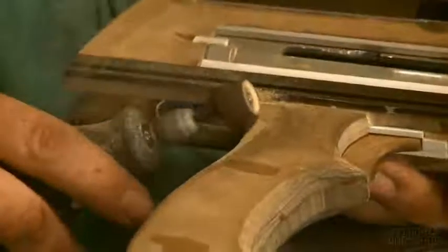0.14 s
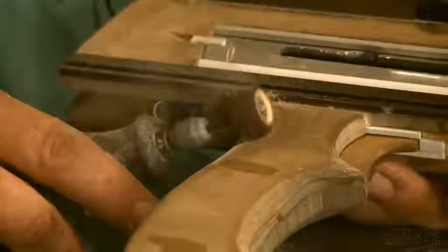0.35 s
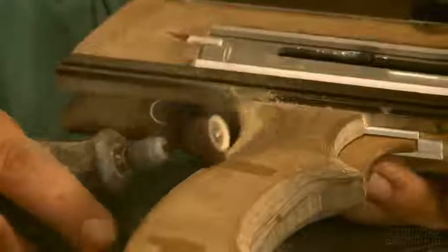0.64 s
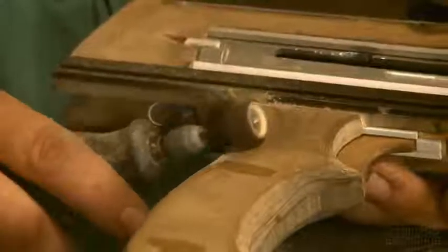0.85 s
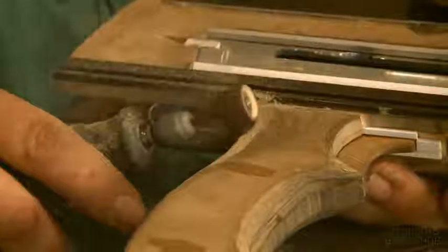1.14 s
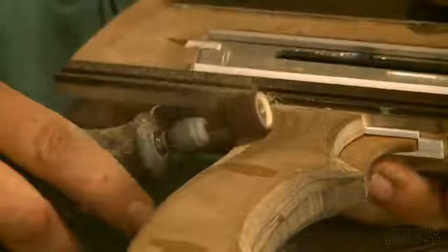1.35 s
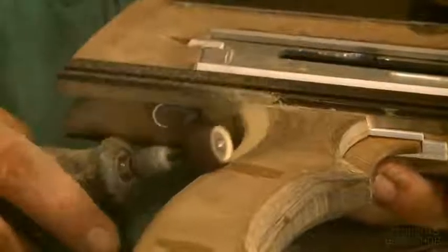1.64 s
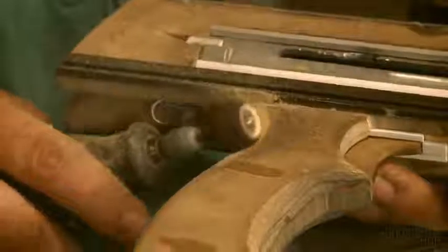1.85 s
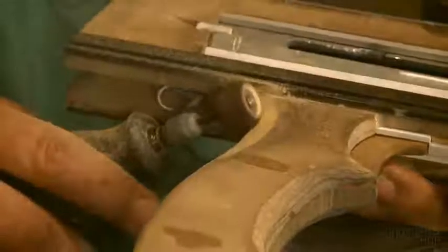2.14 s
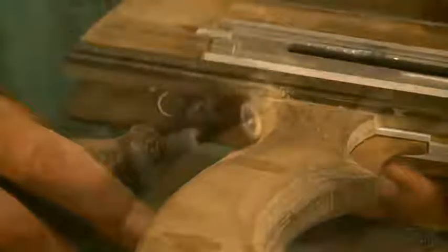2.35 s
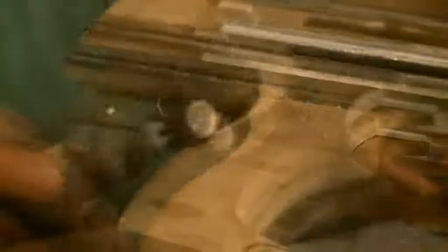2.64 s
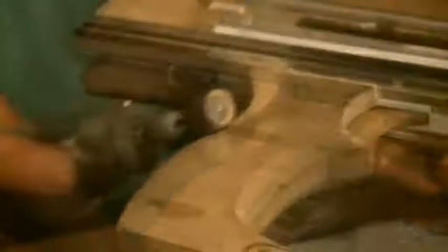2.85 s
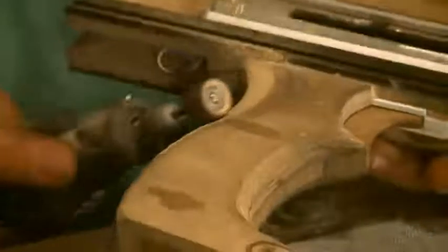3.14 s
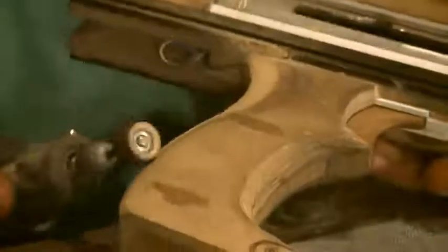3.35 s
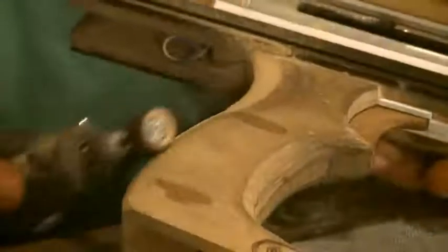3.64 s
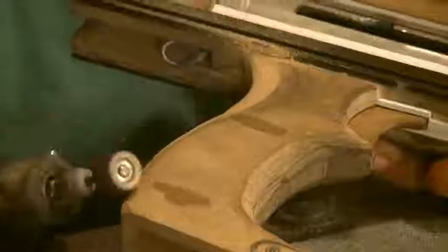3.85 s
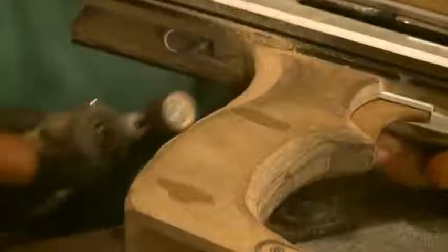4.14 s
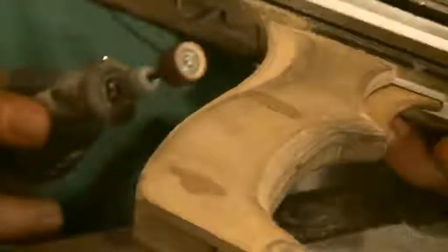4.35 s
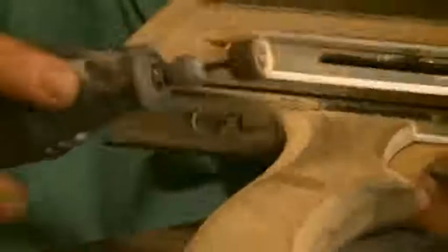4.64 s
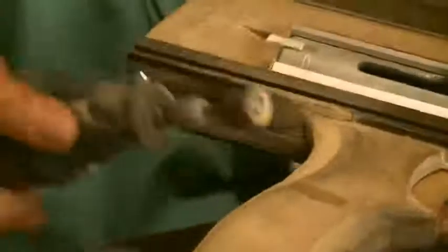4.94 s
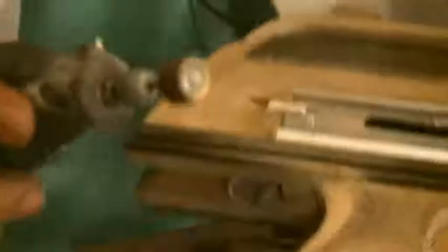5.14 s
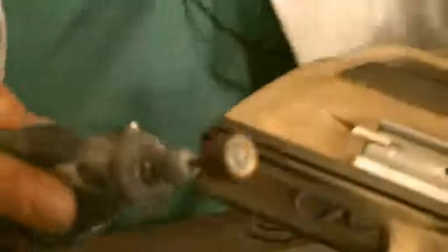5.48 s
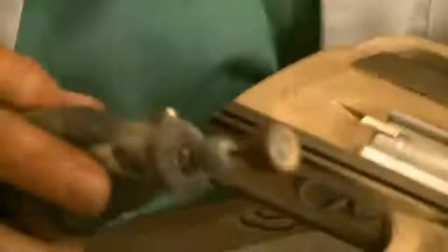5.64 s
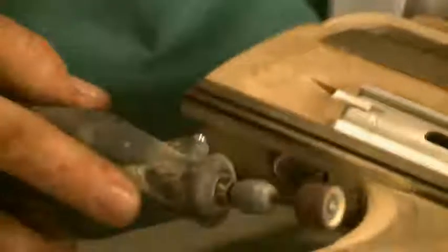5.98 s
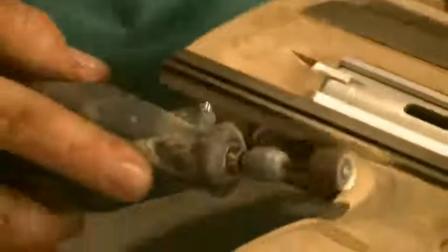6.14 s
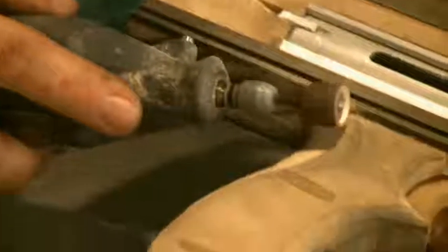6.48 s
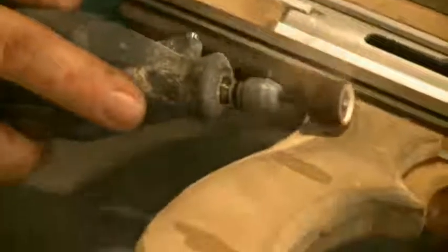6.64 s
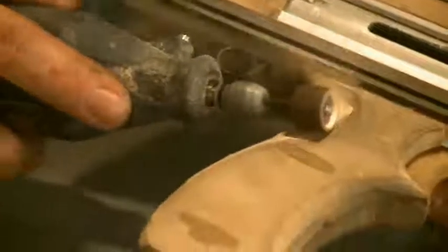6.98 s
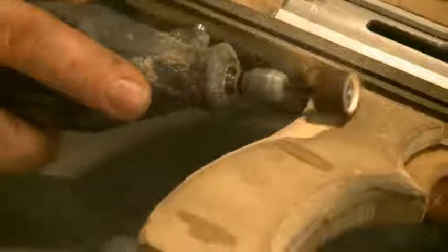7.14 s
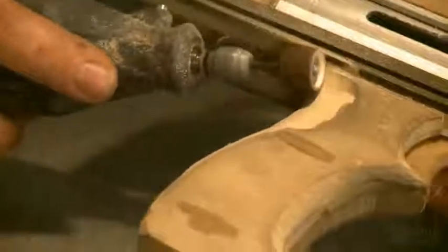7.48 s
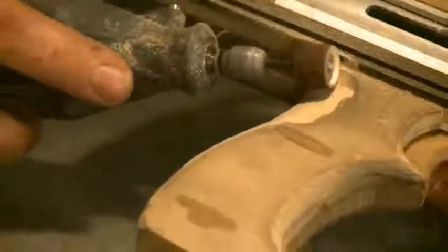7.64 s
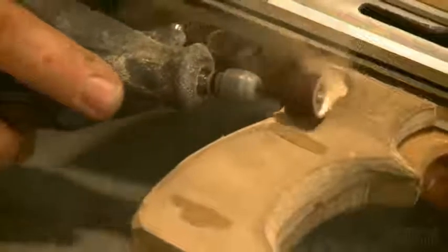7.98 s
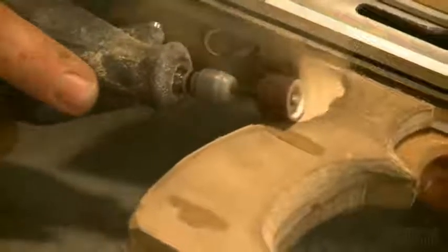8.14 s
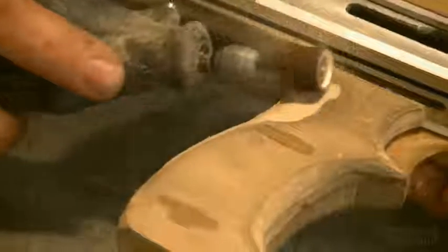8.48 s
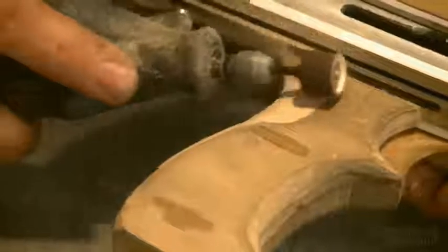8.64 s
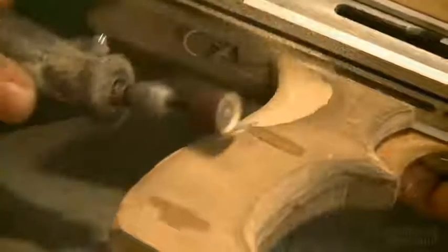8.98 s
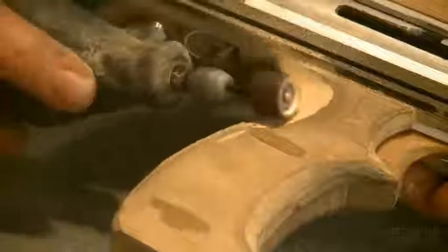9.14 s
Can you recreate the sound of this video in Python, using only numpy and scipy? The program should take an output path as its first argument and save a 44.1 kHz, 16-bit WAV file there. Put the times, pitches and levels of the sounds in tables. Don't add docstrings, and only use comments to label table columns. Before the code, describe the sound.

Close microphone, small quiet room. A motor whine with a buzzy, nasal overtone stack and light bearing tones wavers as a sanding drum touches wood. It starts soft and lower, then dissolves into a faster, harsher pass. The lifted tool spins freer and puffs air on the microphone midway, then bogs slightly in pitch on contact, with dry gritty scraping and a few sudden catches.

```python
import sys
import numpy as np
from scipy import signal
from scipy.fft import rfft, irfft, next_fast_len
from scipy.io import wavfile
from scipy.ndimage import uniform_filter1d, map_coordinates

SR = 44100
rng = np.random.default_rng(int(sys.argv[2]) if len(sys.argv) > 2 else 0)


def amplitude_ratio(level_db):
    exponent = np.asarray(level_db, float) / 20
    return 10 ** exponent


def unload_audio(sound):
    columns = np.transpose(np.atleast_2d(sound))
    steps = np.round(np.clip(columns, -1, 1) * 32767)
    wavfile.write(sys.argv[1], SR, steps.astype(np.int16))


N = 410571
TIME = np.arange(N) / SR
COARSE_TIME = np.arange(0, N, 64) / SR
COMMUTATOR = 18
SLOW_END_S = 2.422

# (time [s], slow pass level [dB], fast pass level [dB])
DISSOLVE = [
    (1.93, 5.5, -40),
    (2.0, 0, -19.5),
    (2.422, -3, -9),
    (2.428, -12, -5.5),
    (2.7, -13.5, -2),
    (2.9, -33, -5.5),
]
# (time [s], turning rate [Hz])
SLOW_SPEED = [(0.0, 349.9), (0.14, 348.3), (0.51, 329.2), (0.7, 341.8), (0.88, 344.8), (1.11, 334.9),
              (1.26, 335.7), (1.49, 320.2), (1.53, 318.9), (1.67, 326.5), (1.86, 320.0), (1.93, 320.6),
              (2.02, 325.6), (2.13, 327.6), (2.38, 322.8), (2.43, 326.2)]
SLOW_LOW = [
    -48,
    -59.5,
    -55,
    -51.5,
]
SLOW_ORDERS = [-15, -9, -7, -5, -14, -19.5, -15.5, -16.5, -14.5, -22, -18, -16, -14, -10.5, -19, -15, -17,
               -19, -19, -19, -34, -21, -15, -10.5, -16, -13, -15]
# (time [s], half length [s], order [number], level over the grit [dB])
SLOW_FLARES = [(0.043, 0.031, 5, -4), (0.103, 0.015, 16, 2), (0.37, 0.045, 24, -3), (0.862, 0.07, 30, -8),
               (1.36, 0.07, 27, -4), (0.474, 0.05, 15, -9), (0.487, 0.043, 8, -7), (0.508, 0.033, 9, -2.5),
               (0.596, 0.085, 6, 4.5), (0.63, 0.09, 4, -2), (1.612, 0.025, 6, 1), (2.042, 0.021, 7, 7),
               (2.16, 0.039, 7, 1.5)]
# (time [s], half length [s], order [number], change [dB])
SLOW_TURNS = [(0.055, 0.2, 1, -9.3), (0.19, 0.19, 3, 4.5), (0.355, 0.026, 3, -14), (0.432, 0.063, 18, -11),
              (0.653, 0.12, 18, -14), (0.766, 0.25, 1, -8), (0.925, 0.32, 2, -10.5), (0.99, 0.071, 3, 6),
              (1.18, 0.091, 1, -7.5), (1.53, 0.26, 18, -8), (1.705, 0.13, 3, -24), (2.113, 0.38, 2, 9),
              (2.205, 0.15, 3, 2), (2.4, 0.15, 1, 7.5)]
# (time [s], half length [s], order
# [number], change [dB])
SLOW_SHIFTS = [(0.13, 0.09, 8, -12.4), (0.226, 0.047, 7, -17), (0.28, 0.2, 5, -4.5), (0.4, 0.08, 12, -10),
               (0.407, 0.09, 4, 4), (0.41, 0.061, 6, 6), (0.74, 0.081, 17, -11.0), (0.75, 0.065, 9, 14),
               (0.94, 0.09, 6, -5), (0.95, 0.04, 5, -12), (1.01, 0.13, 18, -5), (1.06, 0.18, 7, -8),
               (1.078, 0.099, 4, 6), (1.1, 0.2, 17, -5), (1.398, 0.036, 7, 2.5), (1.77, 0.045, 7, -12),
               (1.81, 0.04, 15, -18), (1.885, 0.068, 6, -8), (2.03, 0.04, 6, 7), (2.06, 0.068, 7, -6),
               (2.17, 0.07, 6, -10.7), (2.22, 0.082, 5, -11), (2.251, 0.2, 9, 5), (2.28, 0.055, 3, -5),
               (2.387, 0.06, 6, 3)]
# (frequency [Hz], level [dB])
HOUSING_SLOW = [(250, -18), (500, -16), (1200, -9.5), (1800, -7), (2200, 2.5), (2700, -10.5), (3300, -11),
                (4500, -10.5), (6000, -18)]
HOUSING_DB = [
    -47,
    -34,
]


def slow_pass():
    share_db = curves(DISSOLVE)[0]
    shaft = angle(SLOW_SPEED, shake_hz=0.808)
    low_db = lobes(SLOW_LOW, SLOW_TURNS + SLOW_SHIFTS)
    orders = [k for k in range(4, 32) if k != COMMUTATOR]
    upper_db = [flared(k, db, SLOW_FLARES) + turned(k, SLOW_SHIFTS) for k, db in zip(orders, SLOW_ORDERS)]
    sound = tool(shaft, low_db, orders, upper_db, blur=1.1, ripple_db=-24, housing=HOUSING_SLOW,
                 housing_db=HOUSING_DB[0], null_hz=4230, share_db=share_db, depth=0.68)
    return sound + bites(shaft, 0, SLOW_END_S, HOUSING_SLOW)


POSES = [2.5, 4.2, 4.45, 5.55, 5.75, 6.5, 6.65, 7.75, 7.9, 9.3]
# (time [s], turning rate [Hz])
FAST_SPEED = [(2.05, 513.5), (3.23, 497.5), (3.75, 496.3), (5.01, 525.1), (5.71, 528.1), (6.55, 528.5),
              (6.79, 498.6), (7.11, 498.9), (7.35, 491.2), (7.63, 501.3), (8.01, 473.4), (8.35, 471.0),
              (9.29, 486.7)]
# (time [s], half length [s], change [Hz])
LOADS = [(2.2, .06, -1.5), (2.45, .08, -2), (3.05, .06, 2), (3.92, .07, 2), (4.18, .08, -2.5),
         (2.69, 0.1, 5.2), (2.89, 0.07, -4.1), (3.25, 0.07, -4.2), (3.45, 0.1, 3.3), (3.67, 0.07, -3.0),
         (8.43, 0.07, -3.0), (8.67, 0.1, 4.4), (8.87, 0.07, -6.5), (9.11, 0.1, 4.4), (9.29, 0.045, -7.9)]
FAST_LOW = [
    (-40.5, -35.5, -38.5, -35, -34.5),
    (-32, -27, -31, -31, -45.5),
    (-29.5, -33, -31.5, -35, -32),
    (-32, -29.5, -42.5, -33, -37.5),
    (-33, -28, -28.5, -37, -39),
    (-37.5, -32, -42, -35.5, -41),
    (-42, -41.5, -33, -38.5, -44),
    (-37, -32.5, -41.5, -40.5, -39.5),
]
FAST_ORDERS = [(-7, -5, -10, -18, -15), (-7, -10, -6, -14, -17), (-15, -10, -11, -17, -17),
               (-10, -9, -17, -18, -18), (-11, -8, -9, -10, -10), (-13, -7, -8, -14, -11),
               (-14, -13, 0, -17, -17), (-11, -7, -9, -16, -17), (-13, -11, -6, -15, -15),
               (-18, -11, -10, -11, -19), (-14, -11, -12, -15, -17), (-17, -14, -11, -16, -16),
               (-20, -35, -33, -13, -14)]
# (time [s], half length [s], order [number], level over the grit [dB])
FAST_FLARES = [(2.716, 0.062, 14, -2.5), (4.67, 0.15, 8, -4), (3.4, 0.11, 10, -10), (3.96, 0.055, 8, -12),
               (5.312, 0.054, 19, 2), (5.537, 0.06, 8, 2.5), (5.5, 0.13, 16, -3), (5.636, 0.044, 13, -1),
               (6.58, 0.05, 8, -8), (5.952, 0.12, 16, 1), (6.25, 0.12, 13, -6), (6.687, 0.051, 17, -3),
               (6.728, 0.031, 20, 2.5), (7.04, 0.056, 20, 0.5), (7.4, 0.16, 15, -9), (7.516, 0.1, 9, -6),
               (7.904, 0.087, 20, -1), (8.25, 0.04, 21, -4), (8.256, 0.05, 12, -3), (8.965, 0.079, 10, -4),
               (9.02, 0.045, 8, -10)]
# (time [s], half length [s], order [number], change [dB])
FAST_TURNS = [(2.243, 0.12, 1, 7), (2.45, 0.37, 3, -7), (2.58, 0.27, 4, -7.5), (3, 0.1, 3, 4.5),
              (3.207, 0.074, 1, -16.5), (3.472, 0.025, 3, 4.5), (3.684, 0.18, 1, -13), (4.24, 0.13, 1, 6),
              (4.244, 0.16, 4, -6), (4.51, 0.1, 3, 5.5), (4.524, 0.21, 2, -9.5), (5.12, 0.17, 4, -13.5),
              (5.463, 0.23, 3, -6), (5.54, 0.083, 2, -11.5), (5.727, 0.21, 4, 11), (6.545, 0.023, 3, -5),
              (6.58, 0.033, 4, 10), (6.625, 0.056, 3, -12), (6.58, 0.031, 1, -8), (6.64, 0.03, 2, 9),
              (6.697, 0.02, 1, -6), (6.887, 0.17, 4, -10), (7.895, 0.035, 4, -9), (8.12, 0.15, 3, 5.7),
              (8.156, 0.04, 4, 11.5), (8.405, 0.2, 1, -8.5), (8.652, 0.07, 4, -14.1), (8.844, 0.013, 4, 8),
              (8.905, .03, 4, 5), (9.15, 0.038, 4, 5), (9.15, 0.091, 2, 14), (9.24, 0.045, 3, -10),
              (2.15, 0.15, 18, 4), (2.358, 0.49, 7, -10.9), (2.38, 0.03, 5, -6), (2.44, 0.069, 18, -8),
               (2.543, 0.17, 5, 6), (2.83, 0.024, 5, -24), (3.16, 0.08, 5, -15.3), (3.31, 0.33, 6, 3),
               (3.488, 0.16, 18, 5), (3.535, 0.11, 5, -16), (4.0, 0.12, 5, 2.5), (4.17, 0.032, 18, -14),
               (4.287, 0.069, 5, 8.0), (4.314, 0.25, 18, 7), (4.78, 0.065, 7, -17), (4.784, 0.084, 5, 6.5),
               (4.994, 0.13, 18, -7), (5.08, 0.16, 5, -4.5), (5.384, 0.38, 5, 6.5), (5.506, 0.05, 18, -4.5),
               (5.53, 0.092, 7, 8), (5.702, 0.57, 18, 7.5), (6.614, 0.058, 5, 6.5), (6.668, 0.088, 6, -9),
               (6.71, 0.025, 5, -12), (6.914, 0.054, 6, -17.0), (7.875, 0.075, 6, 7.5),
               (7.968, 0.07, 7, 10.5), (8.436, 0.11, 6, 12.5), (8.61, 0.037, 5, 10), (8.73, 0.052, 6, 9)]
# (time [s], half length [s], order
# [number], change [dB])
FAST_SHIFTS = [(2.776, 0.036, 4, -10), (2.77, 0.036, 14, -6), (2.868, 0.04, 1, -20), (2.92, 0.068, 11, -3),
               (3.46, 0.028, 8, -3), (3.505, 0.069, 11, 10), (3.627, 0.06, 2, -8), (3.714, 0.083, 3, -6),
               (3.777, 0.068, 9, 4), (3.844, 0.044, 7, -18), (4.136, 0.024, 5, -13), (4.217, 0.098, 8, -8),
               (4.405, 0.12, 10, 4.5), (4.44, 0.049, 7, -10.0), (4.46, 0.047, 6, -9.6),
               (4.48, 0.046, 2, -8.4), (4.58, 0.065, 10, -14), (5.1, 0.18, 8, -7), (4.826, 0.042, 18, 5.5),
               (5.014, 0.063, 10, 6.7), (5.083, 0.04, 18, -6), (5.143, 0.1, 12, -11.1), (5.32, 0.048, 12, 8),
               (5.34, 0.09, 11, -14), (5.2, 0.22, 9, 5.5), (5.857, 0.076, 14, -4), (5.898, 0.12, 8, -14),
               (6.01, 0.053, 18, -6), (6.14, 0.058, 4, -12), (6.18, 0.06, 12, -8), (6.28, 0.097, 10, -13),
               (6.33, 0.09, 18, -12), (6.55, 0.07, 10, -12), (6.91, 0.065, 5, -9.2), (7.204, 0.033, 3, -10.3),
               (7.744, 0.06, 7, -8), (7.75, 0.04, 6, -10), (7.912, 0.049, 5, -13), (8.134, 0.06, 6, 5),
               (8.15, 0.067, 5, 3), (8.27, 0.053, 6, -17), (8.35, 0.19, 2, 5.5), (8.59, 0.03, 6, -8),
               (8.66, 0.06, 7, 4), (8.77, 0.04, 5, -10.7), (8.82, 0.04, 7, 11), (8.84, 0.042, 12, -12.6),
               (8.858, 0.03, 5, 4.5), (9.04, 0.09, 11, 8), (9.156, 0.044, 6, 8)]
BLUR = [.85, .6, .4, .9, .9]
RIPPLE = [-20, -18, -16, -19, -19]
BENCH_NULL_HZ = [4780, 4200, 4000, 4030, 5320]
# (frequency [Hz], level [dB])
HOUSING_FAST = [(250, -25), (500, -9.5), (1200, -3), (1800, -0.5), (2300, -0.5), (2900, -2), (3600, -5),
                (4500, -6), (6000, -31)]


def fast_pass():
    def by_pose(values):
        return np.interp(TIME, POSES, np.repeat(values, 2))

    share_db = curves(DISSOLVE)[1]
    shaft = angle(FAST_SPEED, shake_hz=0.49, loads=LOADS)
    low_db = lobes([by_pose(db) for db in FAST_LOW], FAST_TURNS + FAST_SHIFTS)
    orders = [k for k in range(8, 22) if k != COMMUTATOR]
    upper_db = [flared(k, by_pose(db), FAST_FLARES) + turned(k, FAST_SHIFTS) for k, db in zip(orders, FAST_ORDERS)]
    sound = tool(shaft, low_db, orders, upper_db, by_pose(BLUR), by_pose(RIPPLE), housing=HOUSING_FAST,
                 housing_db=HOUSING_DB[1], null_hz=by_pose(BENCH_NULL_HZ), share_db=share_db, depth=0.38)
    return sound + bites(shaft, SLOW_END_S, np.inf, HOUSING_FAST)


# (time [s], level [dB])
NEARNESS = [
    (0.02, -50.5),
    (0.42, -42.5),
    (0.6, -56),
    (0.78, -48.5),
    (3.82, -33),
    (5.32, -27.5),
    (7.24, -33.5),
    (9.28, -32),
]
# (time [s], half length [s], change of the grit [dB])
STROKES = [(0.5, 0.03, 3.5), (0.92, 0.032, 2), (1.16, 0.067, -5.5), (1.38, 0.078, 2), (1.6, 0.062, -10.5),
           (1.96, 0.11, -3.5), (2.24, 0.078, 4.5), (2.5, 0.079, 1), (3.0, 0.44, 3.5), (4.56, 0.066, 2),
           (5.88, 0.17, -2.5), (6.58, 0.13, 2.5), (7.86, 0.077, 3), (8.12, 0.037, -3.5), (8.52, 0.084, -2),
           (8.82, 0.062, 4.5), (8.94, 0.087, -5), (9.2, 0.036, 3)]
# (time [s], half length [s], change [dB])
HOVER = [
    (2.62, 0.22, -6.5),
    (5.25, .25, -0.5),
    (9.0, .15, 0),
]
# (order [number], level over the housing noise [dB])
BEARING = [(3.447, -16.5), (4.447, -25), (5.447, -16), (6.446, -23), (7.447, -23)]
# (time [s], half length [s], change of the ball tones [dB])
RATTLES = [
    (3.3, .4, 2),
    (4.5, .4, 0),
    (7.2, 0.35, 1),
    (9.0, 0.18, 3),
]
# (frequency [Hz], level [dB])
GRIT = [(1500, -15), (3500, -2.5), (5000, 3), (6500, 6), (8500, 6.5), (10500, 6.5), (14000, -30)]


def tool(shaft, low_db, orders, upper_db, blur, ripple_db, housing, housing_db, null_hz, share_db, depth):
    housing_db = housing_db + 0.6 * wobble(6.2) + swells(HOVER)
    grit_db = curves(NEARNESS)[0] + swells(STROKES)
    *low_db, bars_db = low_db
    low_blur = 0.2 * np.minimum(blur, 1)
    low = stack(shaft, range(1, len(low_db) + 1), low_db, low_blur, rate=22, ripple_db=-29)
    bars = stack(shaft, [COMMUTATOR], [bars_db], blur=0.32, rate=30, ripple_db=-21.5)
    upper = stack(shaft, orders, upper_db, blur, rate=28, ripple_db=ripple_db)
    balls = stack(shaft, *np.transpose(BEARING), blur=0.11, rate=5.5, ripple_db=-8.0)
    body = coloured(scraping(shaft, depth=0.47, spread_db=-3.5), housing)
    grit = amplitude_ratio(1.3 * wobble(30)) * coloured(scraping(shaft, depth, spread_db=4), GRIT)
    noise = amplitude_ratio(-0.31) * patchy(amplitude_ratio(housing_db) * body + amplitude_ratio(grit_db) * grit, null_hz)
    tones = low + bars + amplitude_ratio(grit_db + 0.78) * upper + amplitude_ratio(housing_db + swells(RATTLES)) * balls
    return amplitude_ratio(share_db) * (tones + noise)


# (time [s], level [dB], time to die away by 60 dB [s], knock over the scrape [dB])
BITES = [
    (0.09, -29, 0.099, -10),
    (1.293, -37, 0.2, -20.5),
    (6.512, -34.5, 0.067, 6.5),
    (7.83, -32, 0.034, -19),
    (8.825, -24, 0.067, -11),
    (8.848, -31, 0.061, -14),
]


def bites(shaft, after_s, before_s, housing):
    once_a_turn = np.exp(np.cos(shaft))
    scrape = coloured(once_a_turn * rng.standard_normal(N), GRIT)
    knock = coloured(once_a_turn * rng.standard_normal(N), housing)
    out = np.zeros(N)
    for s, db, t60, knock_db in BITES:
        if after_s < s < before_s:
            onset = np.clip((TIME - s) / 0.0032, 0, 1)
            out += amplitude_ratio(db - 60 * np.abs(TIME - s) / t60) * onset * (scrape + amplitude_ratio(knock_db) * knock)
    return out


def angle(speed, shake_hz, loads=()):
    hz = uniform_filter1d(curves(speed)[0], size=SR // 24) + swells(loads)
    return 2 * np.pi * np.cumsum(hz + shake_hz * wobble(60)) / SR


def stack(shaft, orders, levels_db, blur, rate, ripple_db):
    mains = 2 * np.pi * 120 * TIME
    out = np.zeros(N)
    for k, db in zip(orders, levels_db):
        start = rng.uniform(0, 2 * np.pi, 2)
        swing = 1 + 2 * amplitude_ratio(ripple_db + 0.63 * wobble(2.96)) * np.cos(mains + start[1])
        loose = np.clip(blur * k / max(orders), 0, 1) ** 1.2
        along = np.sqrt(1 - loose) + np.sqrt(loose / 2) * wobble(rate)
        across = np.sqrt(loose / 2) * wobble(rate)
        turning = k * shaft + start[0]
        out += amplitude_ratio(db) * swing * (along * np.sin(turning) + across * np.cos(turning))
    return np.sqrt(2) * out


def flared(order, base_db, flares):
    extra = np.zeros(len(COARSE_TIME))
    for s, half, k, db in flares:
        if k == order:
            extra += amplitude_ratio(db) * np.exp(-((COARSE_TIME - s) / half) ** 2)
    fading_db = 3 * (0.5 - wobble(5) ** 2)
    return 20 * np.log10(amplitude_ratio(base_db + fading_db) + np.interp(TIME, COARSE_TIME, extra))


def lobes(bases_db, turns):
    orders = [*range(1, len(bases_db)), COMMUTATOR]
    return [db + turned(order, turns) for order, db in zip(orders, bases_db)]


def turned(order, turns):
    return swells([(s, half, change) for s, half, k, change in turns if k == order])


def scraping(shaft, depth, spread_db):
    turn = (shaft / (2 * np.pi)).astype(int)
    force = amplitude_ratio(spread_db * rng.standard_normal(turn[-1] + 1))[turn]
    return rng.standard_normal(N) * (1 + depth * force * np.cos(shaft))


def patchy(x, null_hz):
    hz, at, z = signal.stft(x, SR, nperseg=512)
    field = uniform_filter1d(rng.standard_normal(z.shape), size=2, axis=0)
    field = unit(uniform_filter1d(field, size=20, axis=1))
    patches_db = 2.2 * field - 6 * np.clip(-field - 1, 0, 2)
    moving_hz = np.interp(at, TIME, null_hz + np.zeros(N))
    nulls_db = 0
    for centre, db in ((moving_hz, -11), (757, -4)):
        nulls_db = nulls_db + db * np.exp(-((hz[:, None] - centre) / 120) ** 2)
    return signal.istft(z * amplitude_ratio(patches_db + nulls_db), nperseg=512)[1][:N]


# (time [s], half length [s], frequency [Hz], change [dB])
HOLES = [(0.275, 0.078, 2940, -18.0), (2.62, 0.066, 4870.0, -28.0), (2.68, 0.17, 870, -16),
         (3.0, 0.066, 4820, -22), (3.46, 0.05, 830, -16), (4.64, 0.072, 3450.0, -19.0),
         (4.884, 0.13, 1290.0, -24), (5.15, 0.12, 1850, -29), (5.16, 0.065, 5030, -18.0),
         (5.17, 0.078, 6070.0, -30), (5.324, 0.132, 2350, -32.0), (5.34, 0.043, 3960.0, -30),
         (5.38, 0.048, 1340.0, -16), (5.62, 0.084, 4570.0, -18), (5.66, 0.072, 2970.0, -28.0),
         (5.81, 0.072, 6590.0, -21.0), (5.97, 0.072, 8370, -20.0), (6.1, 0.4, 2400, -11),
         (6.31, 0.054, 6630.0, -19.0), (6.45, 0.066, 6630.0, -21.0), (6.63, 0.084, 3940, -27.0),
         (6.9, 0.18, 354, -12), (7.54, 0.084, 4180.0, -25.0), (7.59, 0.066, 10160.0, -33.0),
         (7.93, 0.16, 4070, -27)]


def hollowed(x):
    hz, at, z = signal.stft(x, SR, nperseg=2048, noverlap=1536)
    holes_db = np.zeros(z.shape)
    for s, half, centre, db in HOLES:
        holes_db += db * np.exp(-((hz[:, None] - centre) / 75) ** 4 - ((at - s) / half) ** 4)
    return signal.istft(z * amplitude_ratio(holes_db), nperseg=2048, noverlap=1536)[1][:N]


# (time [s], hold [s], level [dB])
GUSTS = [
    (4.573, 0.0091, -53),
    (4.927, 0.27, -48.5),
    (5.304, 0.012, -42.5),
    (5.515, 0.0081, -33.5),
    (5.633, 0.14, -48),
]
# (time [s], peak level [dB], frequency [Hz], half
# length [s])
PUFFS = [(4.58, -37, 160, .01), (4.94, -40, 105, .012), (5.065, -42, 125, .01), (5.165, -40, 125, .01),
         (5.318, -20, 170, .006), (5.507, -30, 150, .006), (5.537, -24, 120, .008), (5.552, -28, 150, .006),
         (5.575, -34, 95, .01), (5.643, -38, 120, .01), (6.2, -50, 220, .02), (6.516, -41, 430, .008),
         (6.514, -37, 900, .007), (6.518, -36, 1260, .008)]
# (frequency [Hz], level [dB])
AIR = [(25, -45), (68, -21), (85, 0), (125, -11), (165, -7.5), (250, -9), (400, -19), (900, -27.5)]


def buffeting():
    gusts = np.zeros(N)
    for s, hold, db in GUSTS:
        rise_db = 270 * np.clip(s - TIME, 0, 1)
        fall_db = 146 * np.clip(TIME - s - hold, 0, 1)
        gusts += amplitude_ratio(db - rise_db - fall_db)
    out = gusts * unit(amplitude_ratio(3.9 * wobble(25)) * coloured(rng.standard_normal(N), AIR))
    for s, db, hz, half in PUFFS:
        out += amplitude_ratio(db) * np.exp(-((TIME - s) / half) ** 2) * np.cos(2 * np.pi * hz * (TIME - s))
    return out


# (frequency [Hz], level [dB])
ROOM = [(25, -30), (55, -16), (70, -17), (85, 1), (130, -4), (250, -7.5), (600, -13), (1500, -26.5)]


def room_tone():
    return amplitude_ratio(-60.5 + 0.8 * wobble(2.7)) * coloured(rng.standard_normal(N), ROOM)


def unit(x):
    return x / np.sqrt(np.mean(x ** 2) + 1e-20)


def curves(rows):
    s, *columns = np.transpose(rows)
    return [np.interp(TIME, s, column) for column in columns]


def swells(rows):
    total = np.zeros(len(COARSE_TIME))
    for s, half, size in rows:
        total += size * np.exp(-((COARSE_TIME - s) / half) ** 2)
    return np.interp(TIME, COARSE_TIME, total)


def wobble(rate):
    at = np.arange(0, N + 64, 64)
    knots = rng.standard_normal(int(N * rate / SR) + 4)
    return np.interp(np.arange(N), at, map_coordinates(knots, [at * rate / SR]))


def coloured(x, points):
    m = next_fast_len(N + 8192)
    hz, db = np.transpose(points)
    bins = np.log(np.fft.rfftfreq(m, 1 / SR) + 1)
    gain = amplitude_ratio(np.interp(bins, np.log(hz), db, left=-120))
    return unit(irfft(rfft(x, m) * gain, m)[:N])


def scene():
    work = hollowed(slow_pass() + fast_pass())
    return (work + buffeting() + room_tone())[None]


def low_pass(x):
    return signal.sosfilt(signal.butter(12, 11820, fs=SR, output="sos"), x)


def record(dry):
    hz = np.fft.rfftfreq(N, 1 / SR)
    gain_db = np.interp(hz, [10710, 10820, 11250, 11350, 11520, 11680], [0, -60, -60, -8, -8, -60])
    spectrum = rfft(dry) * amplitude_ratio(gain_db)
    kept = irfft(spectrum * (hz < 11000), N)
    leak = irfft(spectrum * (hz >= 11000), N)
    flicker = np.clip(8 * wobble(28) - 1, 0, 1)
    return low_pass(kept + flicker * leak)


dry = scene()
out = record(dry)
unload_audio(out)
```